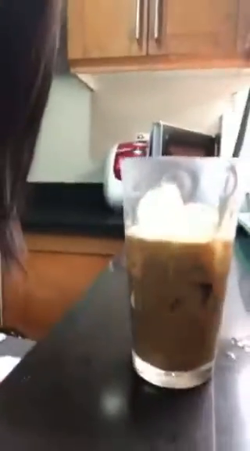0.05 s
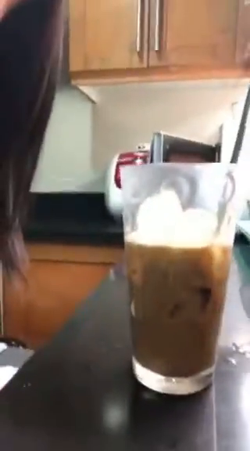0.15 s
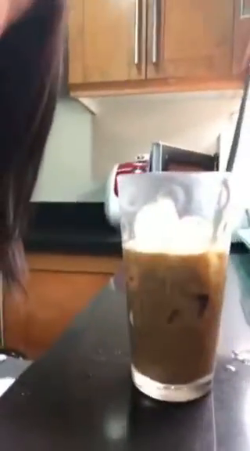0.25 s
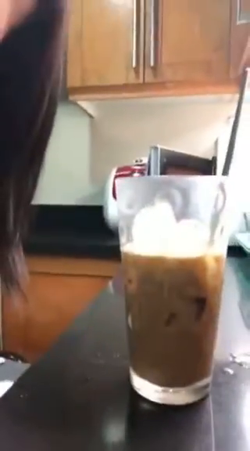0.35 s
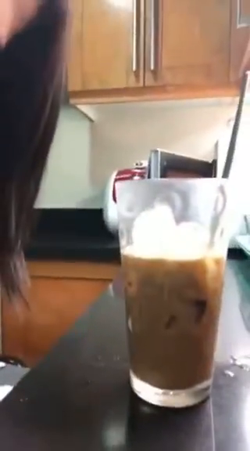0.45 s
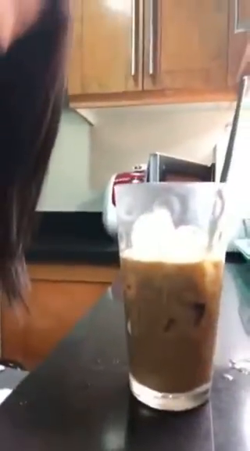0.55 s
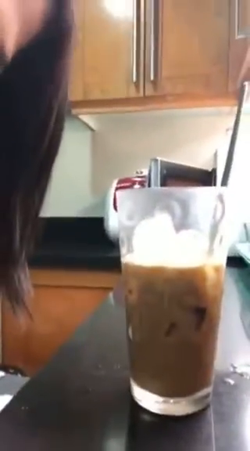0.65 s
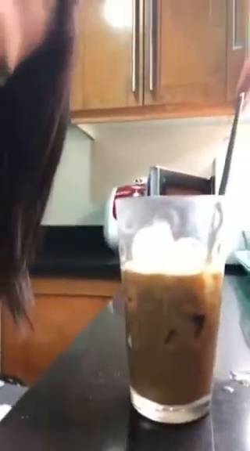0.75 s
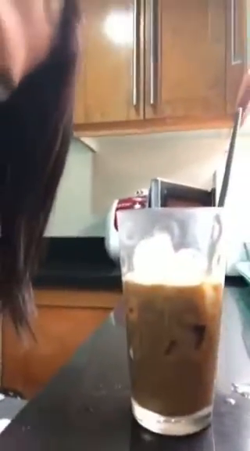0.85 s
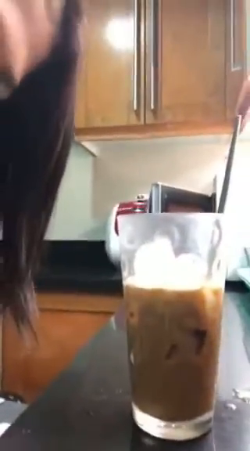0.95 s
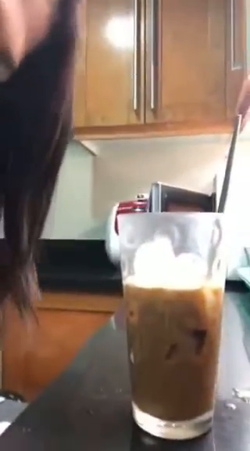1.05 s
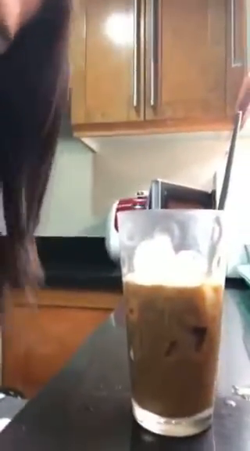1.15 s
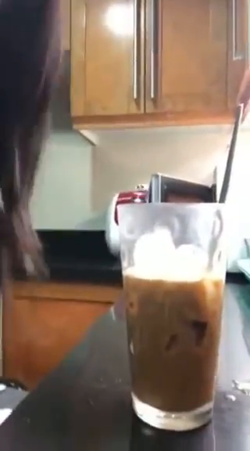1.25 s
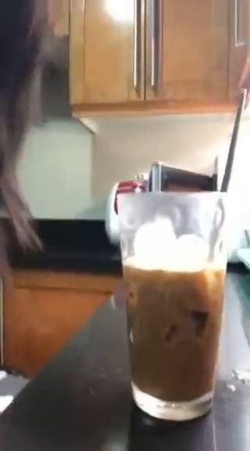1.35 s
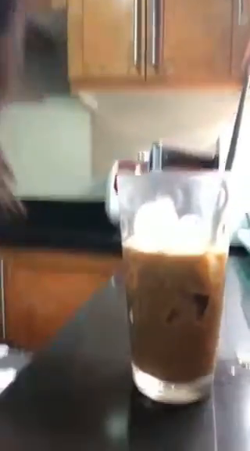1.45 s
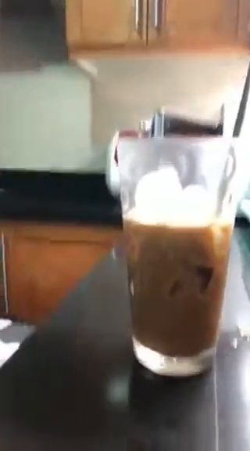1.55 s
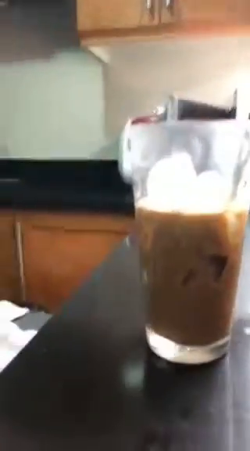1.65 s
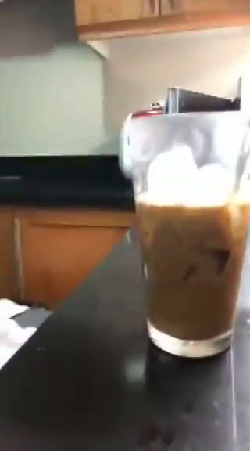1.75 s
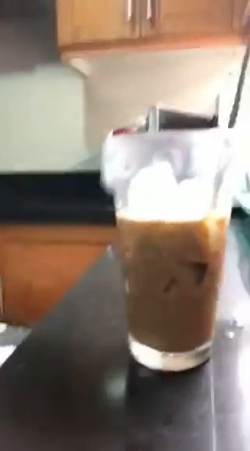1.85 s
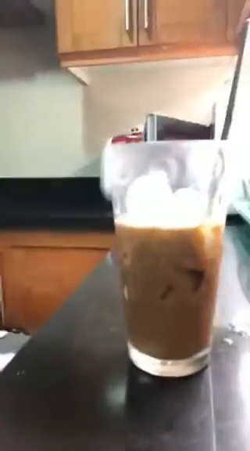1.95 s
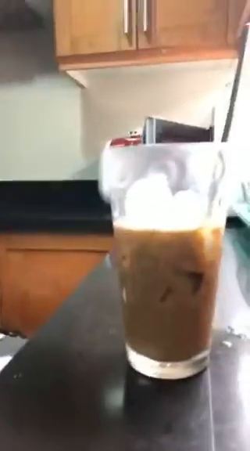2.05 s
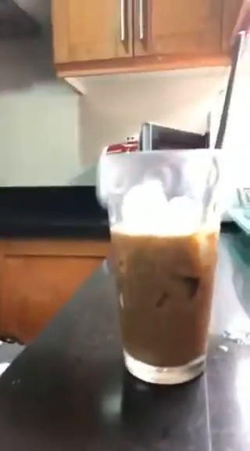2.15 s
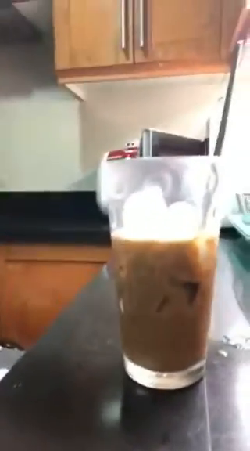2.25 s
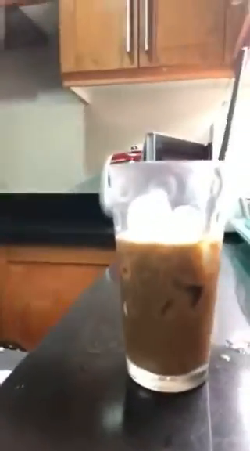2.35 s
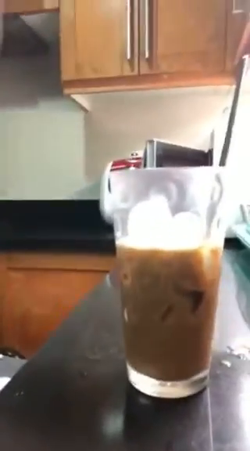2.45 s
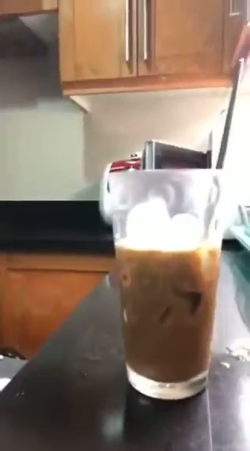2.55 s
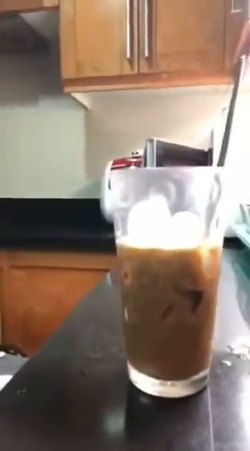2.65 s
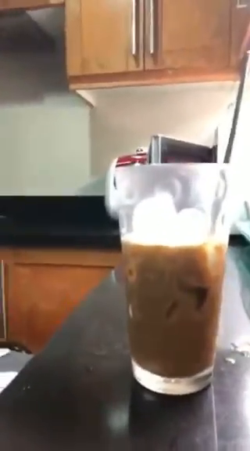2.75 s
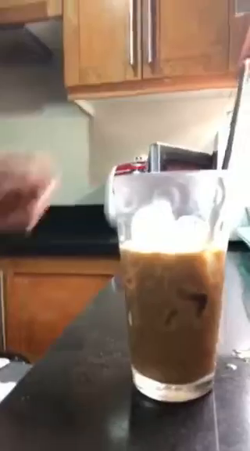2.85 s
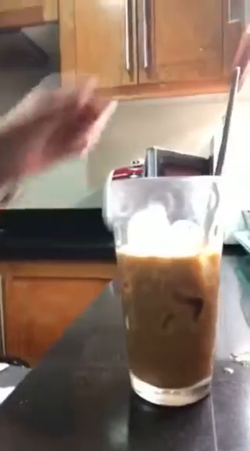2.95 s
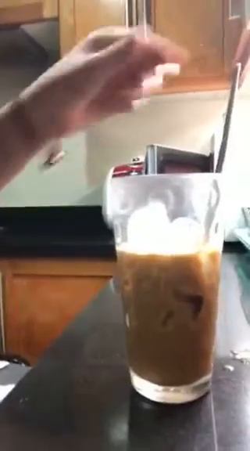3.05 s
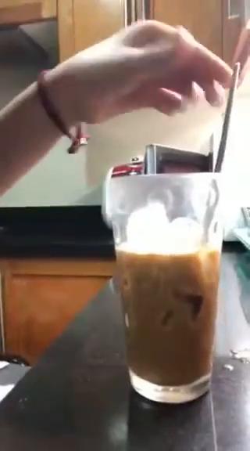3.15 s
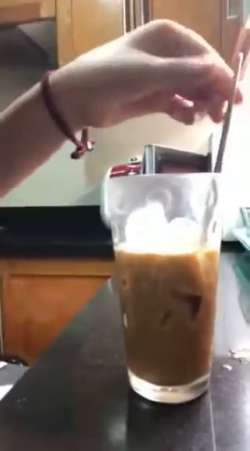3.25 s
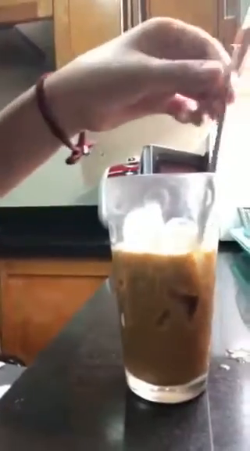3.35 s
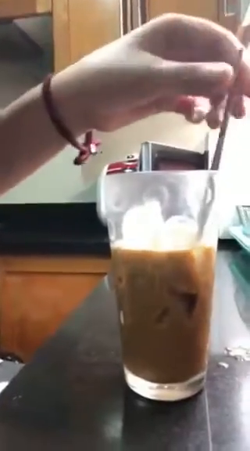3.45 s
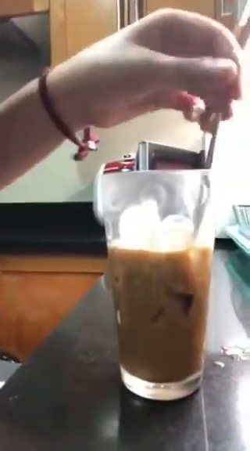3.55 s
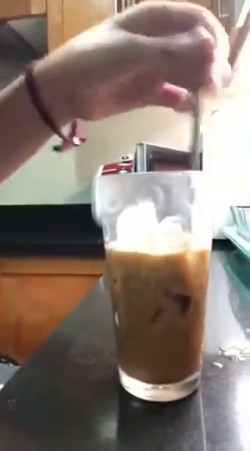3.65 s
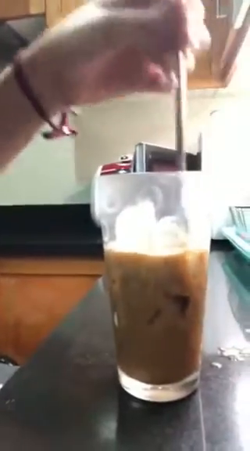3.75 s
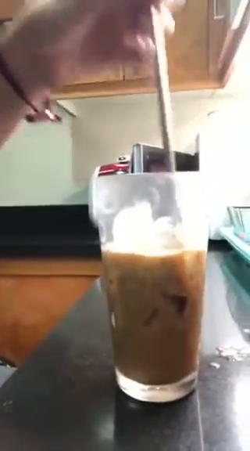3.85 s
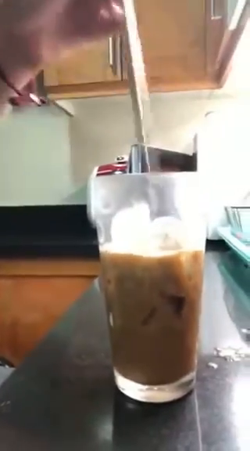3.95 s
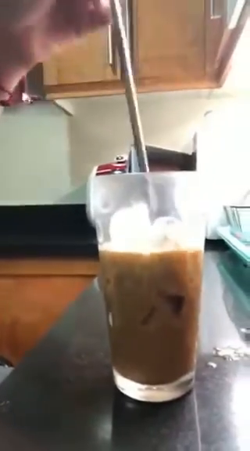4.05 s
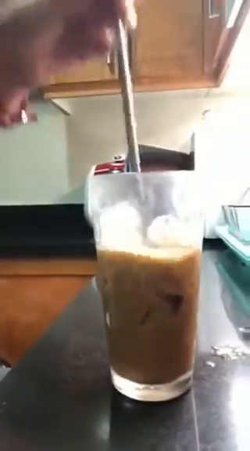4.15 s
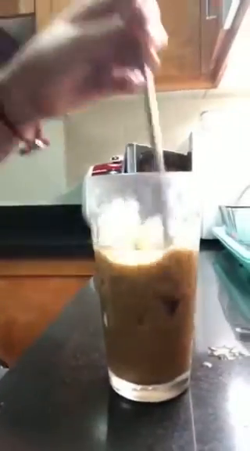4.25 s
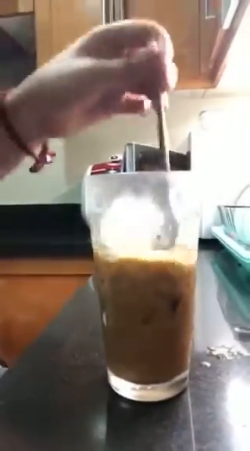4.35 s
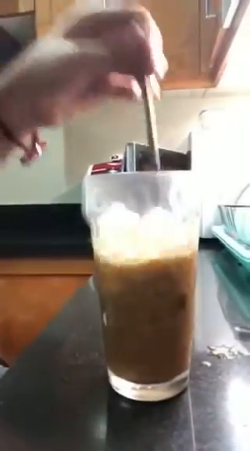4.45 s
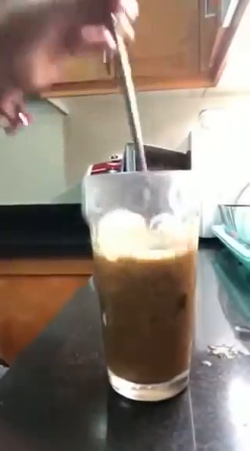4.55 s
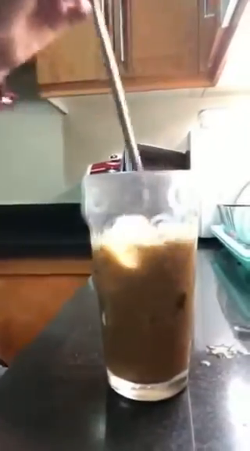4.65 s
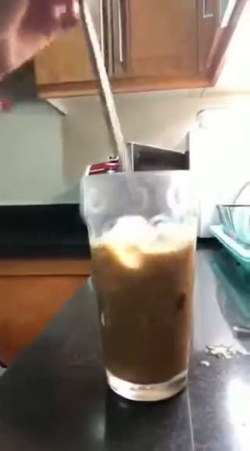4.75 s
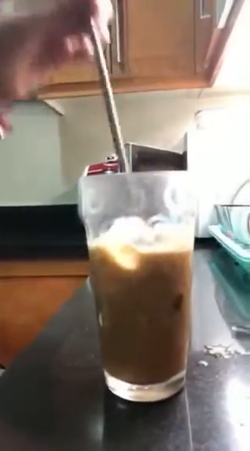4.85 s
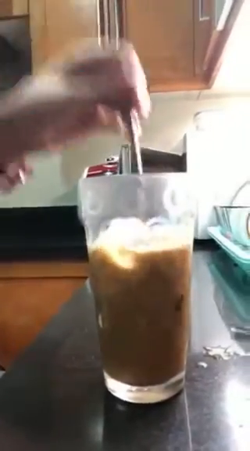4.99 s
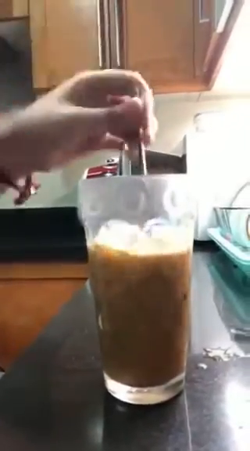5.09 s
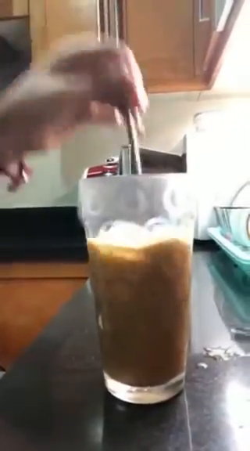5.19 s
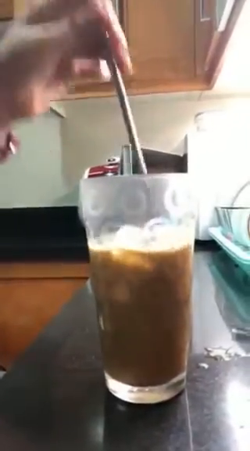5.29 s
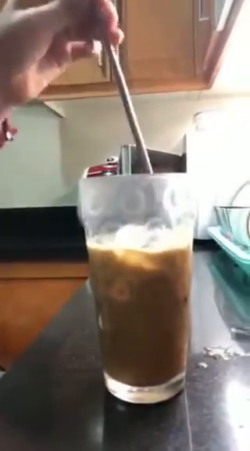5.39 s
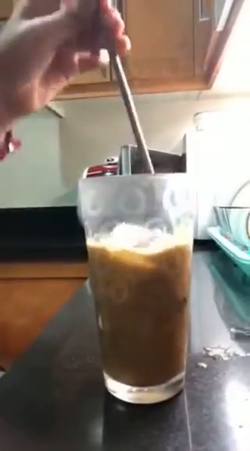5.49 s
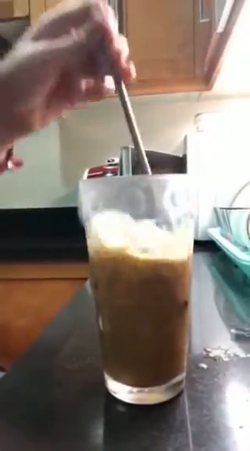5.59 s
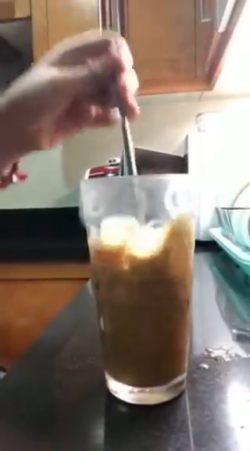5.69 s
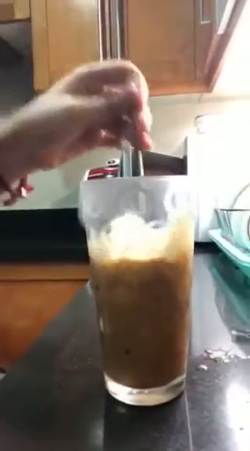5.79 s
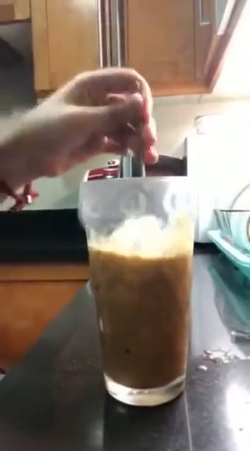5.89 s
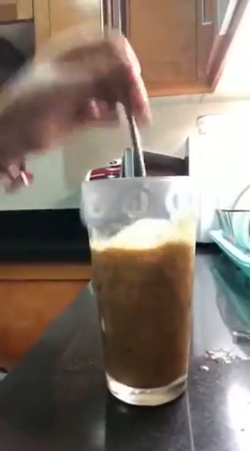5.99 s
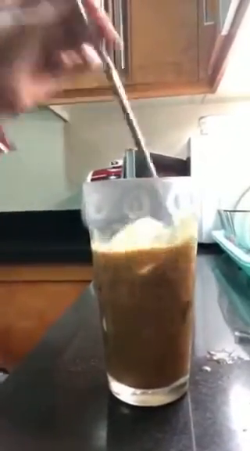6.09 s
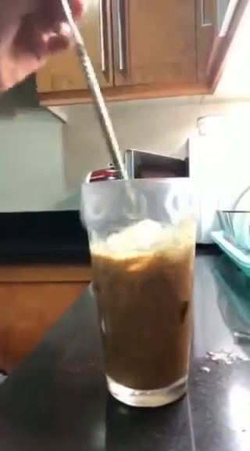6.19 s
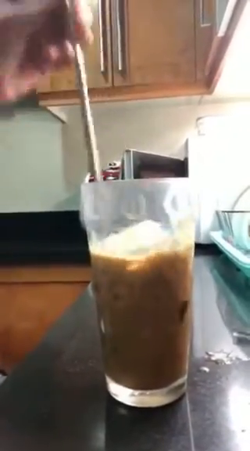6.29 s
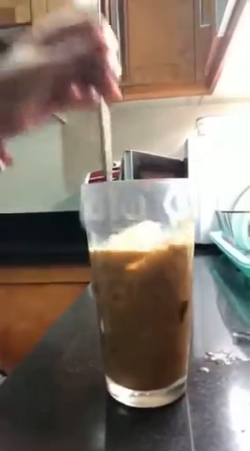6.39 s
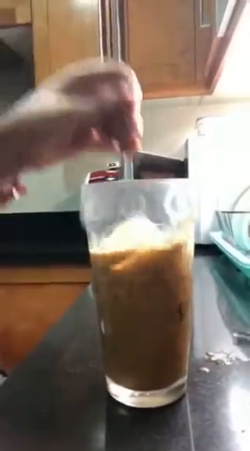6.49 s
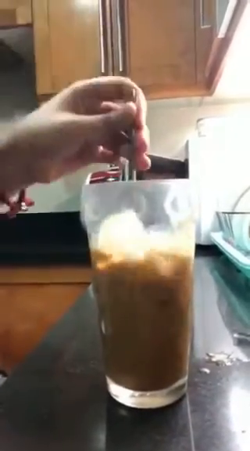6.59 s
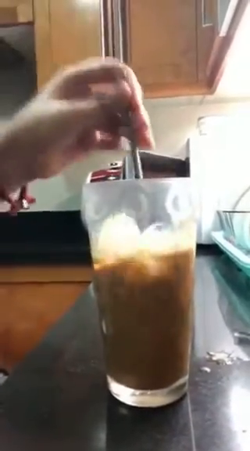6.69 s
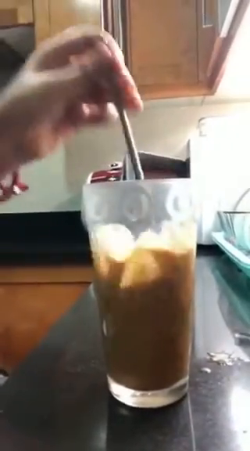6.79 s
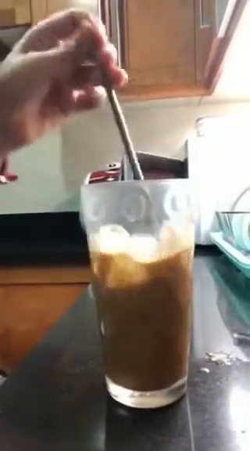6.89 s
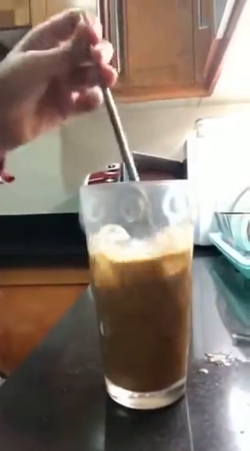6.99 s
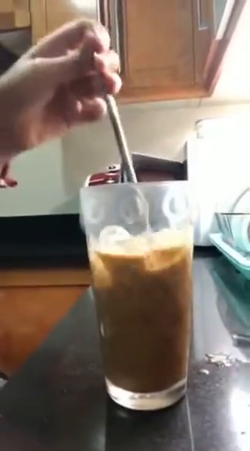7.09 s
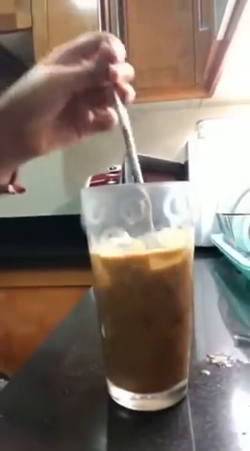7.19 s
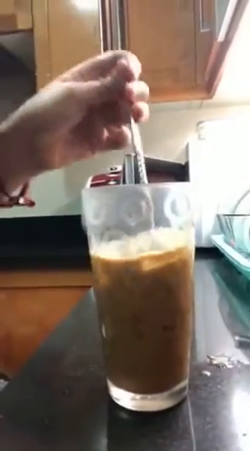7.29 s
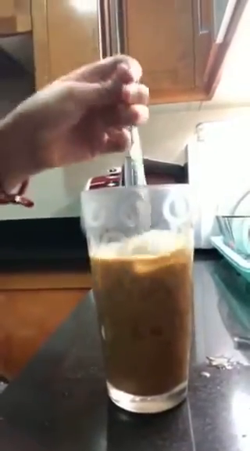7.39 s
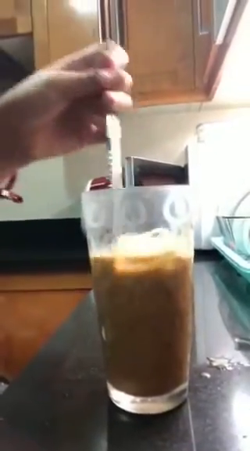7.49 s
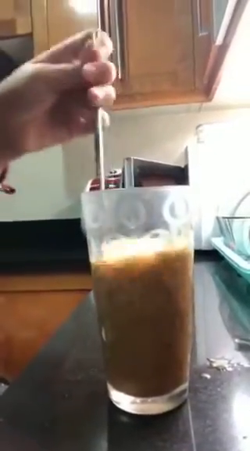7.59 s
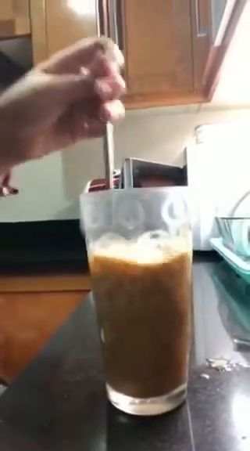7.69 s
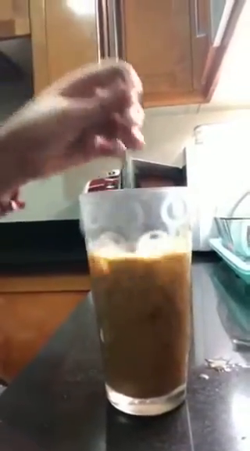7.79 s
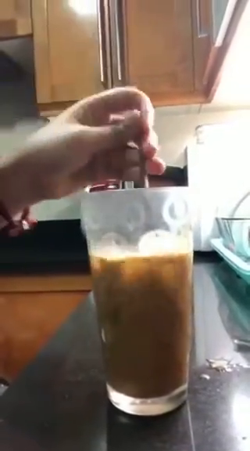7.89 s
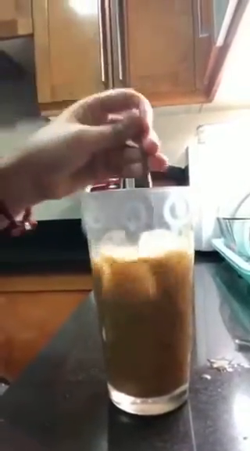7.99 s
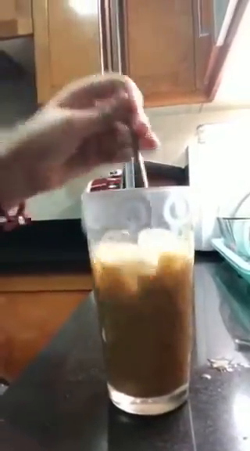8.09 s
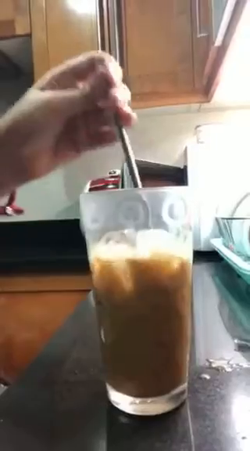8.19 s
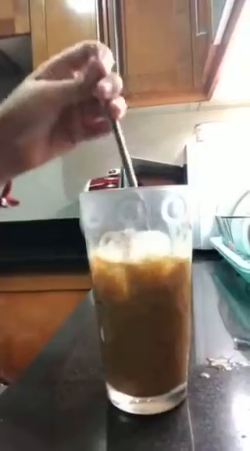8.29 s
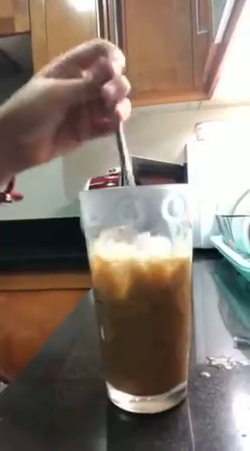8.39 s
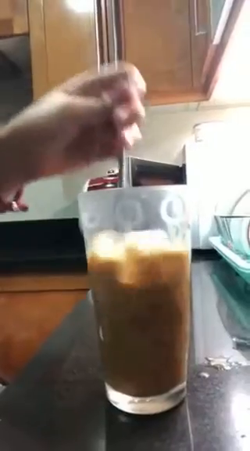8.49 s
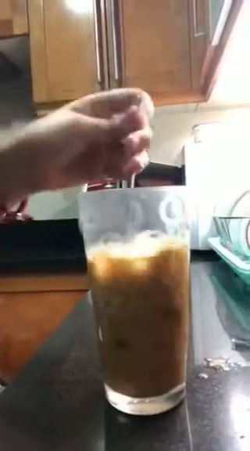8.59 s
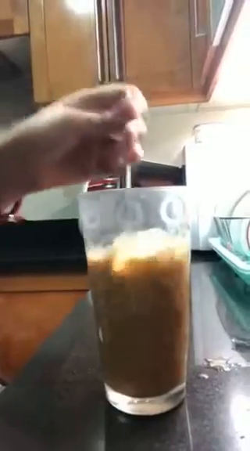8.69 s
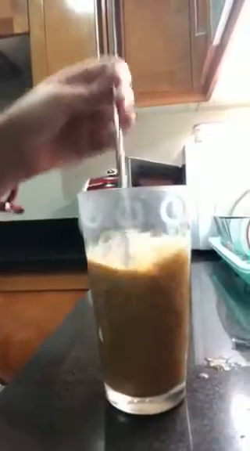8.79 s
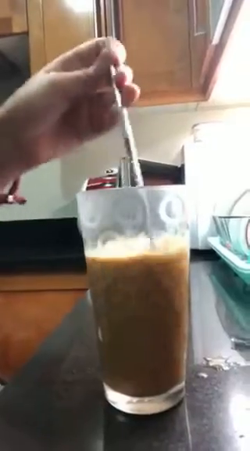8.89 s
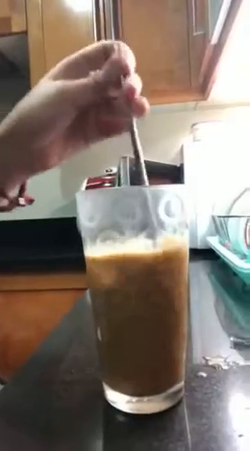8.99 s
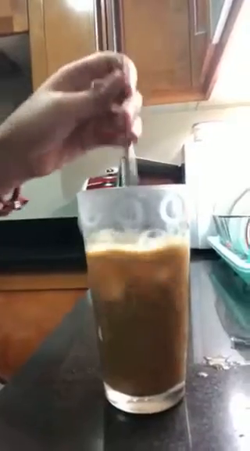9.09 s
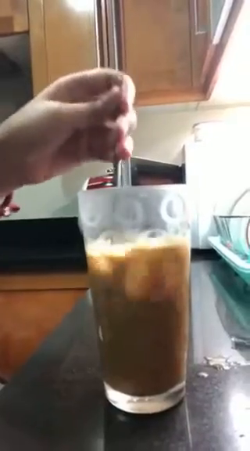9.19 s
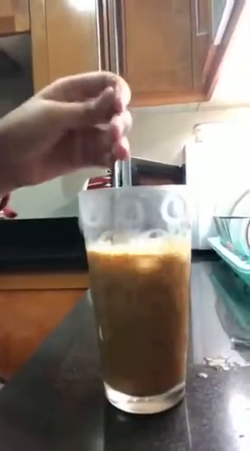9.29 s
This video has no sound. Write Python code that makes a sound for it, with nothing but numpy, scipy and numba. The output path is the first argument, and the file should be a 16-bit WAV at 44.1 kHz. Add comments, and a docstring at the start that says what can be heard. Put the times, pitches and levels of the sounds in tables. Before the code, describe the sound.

A quiet kitchen has a faint, steady background noise and a low fridge hum. During the first second, a few soft, dull taps and ticks sound right at the microphone, followed by one sharp click at about 1.6 seconds. A very faint, distant high ring comes near 2.2 seconds. At about 3.2 seconds a metal spoon touches a tall glass of iced coffee, close by, with a tiny scrape and a few light clinks. From about 4 seconds the stirring gets going: spoon and ice cubes knock irregularly against the glass, several times a second, their ring damped by the drink. Smaller cube collisions and tiny bubbles rattle between the knocks, and the spoon sometimes gives a high ping. The sharpest clinks fall around 4.3 and 5.7 seconds. The stirring continues in uneven surges until the end, a little after 9 seconds.

```python
"""A long metal spoon stirs ice cubes in a tall glass of coffee, close to a phone microphone in a quiet
kitchen. Spoon and cubes knock on the glass, whose modes the drink damps; the spoon pings high; lesser
collisions and bubbles rattle between the knocks. Before the stirring starts, about 3 s in, come a few
dull taps and ticks right at the microphone and one faint, far ring. A fridge hums in the background."""
import sys
import numpy as np
from scipy import signal
from scipy.fft import rfft, irfft
from scipy.io import wavfile
from scipy.ndimage import uniform_filter1d
from numba import njit

SR = 44100
rng = np.random.default_rng(int(sys.argv[2]) if len(sys.argv) > 2 else 0)


def master(y):
    """Save y as 16-bit WAV."""
    cut = np.clip(np.atleast_2d(y).T, -1, 1)
    pcm = np.round(cut * 32767)  # scale
    wavfile.write(sys.argv[1], SR, pcm.astype(np.int16))


N = 411894

# Blows on the glass, close up: (time [s], level [dB], deep modes [dB], bright modes [dB], cube ring [Hz])
KNOCKS = [(3.1965, -41, -9, -9, 2920), (3.269, -33.5, -20, -15, 3010), (3.3667, -24, -12, -2, 2610),
          (3.3991, -34.5, -13, -1.5, 4200), (3.411, -31.5, -16, -24, 2480), (3.617, -52, -1, -7, 4500),
          (3.9633, -29.5, -17, -4.5, 2475), (4.1166, -20.5, -6, -12.5, 2580),
          (4.144, -24.5, -9, -3.5, 3030), (4.1556, -22.5, -12, -18, 1670), (4.2199, -21.5, -3, -1, 1420),
          (4.2505, -33, -10, -5, 2700), (4.2665, -29, 8, -4, 2550), (4.2567, -27, 4.5, -3, 1840),
          (4.304, -17, -17, -9.5, 1793), (4.343, -24, -16, -6, 5500), (4.35, -15, -12.5, -9.5, 4070),
          (4.383, -18.5, -9, -6, 2820), (4.4476, -23, -3.5, -35, 1786), (4.4887, -23, -4, -8, 1754),
          (4.5676, -25.5, -2, -21, 1310), (4.8099, -36, -14, 0.5, 1330), (4.822, -28, 1.5, 0.5, 2840),
          (4.858, -27.5, -30, -11, 5400), (4.888, -30, -8, -1.5, 2810), (4.902, -30, -12, -6, 2750),
          (5.0242, -18.5, 0.5, -7, 2827), (5.1649, -27.5, -2, 8, 5200), (5.182, -47.5, -19, 23.5, 4500),
          (5.232, -44, -20, 12, 4700), (5.46, -27.5, 0, -12.5, 1316), (5.4822, -36.5, 5.5, -13, 1116),
          (5.52, -30, -7, -4, 2900), (5.577, -28, -8, -15, 1970), (5.607, -20, -34, -7, 2647),
          (5.6308, -19.5, -4, -27, 2590), (5.6415, -13.5, -21, -3.5, 4260), (5.6743, -24, -0.5, -17, 2910),
          (5.7386, -29.5, -5, -23, 2940), (5.8008, -14, -6, -3.5, 3710), (5.926, -31.5, -2, -12, 2840),
          (5.9478, -26.5, -31, -13, 4260), (5.9707, -25.5, -30, -3, 5080), (6.048, -34, -18, 3, 4550),
          (6.145, -36, -8, -19, 2530), (6.3257, -34.5, -19, 8.5, 4470), (6.3713, -30, -20, 3.5, 4200),
          (6.3991, -24.5, -11, -3.5, 4370), (6.5062, -30, -12, -19, 1630), (6.518, -38, 1, -8, 1780),
          (6.5341, -26.5, -13, -16, 1700), (6.6364, -34, -20, -14, 2850), (6.7152, -34, -2, -2, 1660),
          (6.7397, -34.5, 1.5, -26, 1390), (6.5546, -27, -19, -8, 2900), (6.6664, -26, -9, -18, 2740),
          (6.7936, -30, -19, -6.5, 2800), (6.819, -29.5, -7, -5.5, 2880), (6.9063, -39.5, 12.5, -6, 1240),
          (7.001, -26, -6, -11, 1598), (7.043, -32, -27, -10, 2750), (7.126, -29.5, -5.5, -5.5, 1633),
          (7.251, -40.5, 2, 6.5, 4500), (7.2656, -23, 0, -14, 1614), (7.286, -37.5, -16, -2, 2800),
          (7.4156, -23.5, -7.5, -13.5, 1585), (7.4386, -33, -12, -13, 1610), (7.4655, -30, -5, -19, 1570),
          (7.5369, -27, -11, -13, 2230), (7.4915, -27.5, -10, -22, 3460), (7.5545, -26, -21, -11, 1630),
          (7.626, -25, -18, -14.5, 1520), (7.6523, -28, 1.5, -4.5, 1590), (7.6838, -21.5, -28, -8, 3460),
          (7.696, -25, -7, -20, 1590), (7.7174, -28.5, -23, -5.5, 3180), (7.7773, -30.5, -4, -17, 1470),
          (7.753, -28.5, -14, -2.5, 1490), (7.8402, -31, 2, -16, 1520), (7.8651, -34, 3, -4, 1650),
          (7.8906, -31, -8, -6.5, 2380), (7.9519, -32.5, -5, -6, 4230), (7.9943, -34, -3, -16, 2810),
          (8.07, -32.5, -21, -9, 2870), (8.1704, -35.5, -6, -5.5, 4380), (8.278, -35, -3, 3.5, 4900),
          (8.4014, -22, -38, -1.5, 6780), (8.4588, -22.5, -20, -11.5, 2610), (8.5264, -24, -3, -2, 3000),
          (8.542, -25, -12, -8, 2700), (8.577, -17.5, -26, -7, 2820), (8.683, -22.5, -19, -6.5, 1570),
          (8.6982, -20.5, -10, -16, 2620), (8.7129, -21, -4.5, -19, 1610), (8.781, -28, 3, -7, 1680),
          (8.8487, -26, -3.5, -9, 2180), (8.907, -25, -22, -12.5, 2740), (8.951, -19.5, -11, -13.5, 1600),
          (8.991, -26, -23, -8, 2390), (9.0377, -21, -20, -10, 2300), (9.0811, -23.5, -16, -5, 1590),
          (9.0913, -27, 1, 3.5, 4900), (9.1335, -21.5, -6, -11, 1630), (9.2382, -23, -25, -10.5, 4730),
          (9.276, -23.5, -32, -26, 1610)]
# Worktop under the glass: (frequency [Hz], level against the blow [dB], t60 [s])
WORKTOP_MODES = [(140, -33.5, 0.06), (223, -30.5, 0.19)]
# Rim of the glass: (frequency [Hz], level against the blow [dB], t60 [s])
RIM_MODES = [(2520, -20, .35), (2680, -16, .2), (4160, -19, .3)]


def knocks(churn_from_s=4.1):
    """Hard blows: a dry crack, then glass, struck cube, worktop and, in a still drink, the rim ring."""
    times, blow_db, deep_db, bright_db, cube_hz = np.transpose(KNOCKS)
    weak_db = np.minimum(blow_db + bright_db + 22, 0)  # weak blows lack the very top

    def colour(hz):
        deep = deep_db[:, None] * (1 - octave_ramp(hz, 1700, .5))
        bright = bright_db[:, None] * octave_ramp(hz, 3000, .4)
        top = weak_db[:, None] * octave_ramp(hz, 6200, .5)
        return blow_db[:, None] + deep + bright + top
    click = crack(times, colour, t60=.012, contact_s=.0012, count=28)
    body = glass(times, colour, detune=.02, damping=1.1, contact_s=.0012)
    cube = rings(times, blow_db + 1.5, cube_hz, t60=.022, contact_s=.0012)
    afterring = rings(times, blow_db - 20.5, cube_hz, t60=240 / cube_hz, contact_s=.0036)
    hz, db, t60 = np.transpose(WORKTOP_MODES)
    thump = rings(times[:, None], blow_db[:, None] + db, hz, t60, contact_s=.001)
    hz, db, t60 = np.transpose(RIM_MODES)
    still = times < churn_from_s
    rim = rings(times[still, None], blow_db[still, None] + db, hz, t60, contact_s=.003)
    return click * undb(-1) + body * undb(-8) + cube + afterring + thump + rim


# The filled glass: (frequency [Hz], relative level [dB], t60 before extra damping [s])
GLASS_MODES = [(485, -9.5, 0.042), (725, -14, 0.092), (925, -14.5, 0.052), (1121, -15, 0.1),
               (1422, -10, 0.094), (1593, -11, 0.082), (1804, -2, 0.036), (2269, -4.5, 0.026),
               (2427, -7, 0.035), (2610, -11.5, 0.052), (2820, -2, 0.014), (3215, -1.5, 0.032),
               (3724, 14.5, 0.0078), (4224, 6.5, 0.022), (4500, 12, 0.014), (5010, 6.5, 0.023),
               (5564, 8.5, 0.011), (6423, 2.5, 0.032), (7646, 6.5, 0.032)]


def glass(times, colour, detune, damping, contact_s, scatter_db=4):
    """Each blow lands elsewhere and the drink moves, so every mode varies in level, pitch and phase."""
    hz, db, t60 = np.transpose(GLASS_MODES)
    size, mistune, phase = np.moveaxis(rng.standard_normal((len(times), len(hz), 3)), -1, 0)
    mode_db = db + colour(hz) + scatter_db * size
    return rings(times[:, None], mode_db, hz * (1 + detune * mistune), t60 / damping, contact_s, phase)


def crack(times, colour, t60, contact_s, count):
    """The ice and the contact itself: very short rings of random pitch merge into a dry, broad click."""
    offset, phase = np.moveaxis(rng.random((len(times), count, 2)), -1, 0)
    hz = 600 * 16 ** ((np.arange(count) + offset) / count)
    edges_db = -5 * octave_ramp(hz, 5000, 1) - 8 * np.clip(np.log2(1500 / hz), 0, 2)
    return rings(times[:, None], colour(hz) + edges_db, hz, t60, contact_s, phase)


# Pings of the spoon, close up: (time [s], level [dB], t60 as the grip allows [s])
SPOON_PINGS = [(3.1963, -40.5, 0.17), (3.367, -23, 0.028), (3.399, -39.5, 0.3), (4.22, -38, 0.13),
               (4.354, -37, 0.21), (4.382, -24.5, 0.061), (4.488, -38, 0.098), (5.168, -38, 0.47),
               (5.607, -28, 0.086), (5.8, -11, 0.056), (5.852, -30, 0.068), (6.3983, -31, 0.029),
               (8.4048, -38, 0.21), (8.8472, -31, 0.047)]
# High modes of the spoon: (frequency [Hz])
SPOON_MODES = [7310, 7365, 7460, 7565, 7640]


def spoon(main_hz=7380):
    """Closely spaced modes of the metal beat against each other; those near main_hz are strongest."""
    times, db, t60 = np.transpose(SPOON_PINGS)[..., None]
    hz = np.array(SPOON_MODES)
    falloff_db = -9 * np.minimum(np.abs(hz - main_hz) / 150, 1.5)
    phase = rng.random((len(times), len(hz)))
    return rings(times, db + falloff_db, hz, t60, contact_s=.00014, phase=phase)


# One slide along the rim: (start [s], length [s], level per slip [dB], ring [Hz], t60 [s])
RIM_SLIDE = (3.198, .045, -48, 3110, .05)


def scrape(slips=24):
    """The spoon sticks and slips on the rim; the dense ticks keep one ring alive."""
    start, length, db, hz, t60 = RIM_SLIDE
    moment, mistune, phase = rng.random((slips, 3)).T
    times = start + length * moment
    ticks = crack(times, lambda _: db - 6, t60=.008, contact_s=.0008, count=10)
    return ticks + rings(times, db, hz * (1 + .06 * (mistune - .5)), t60, contact_s=.0012, phase=phase)


# Pushes through the ice: (start [s], length [s], level [dB], change over the push [dB], bright modes [dB])
PUSHES = [(3.195, 0.042, -46, -4, -13.5), (3.37, 0.026, -53.5, 5, -6), (3.96, 0.043, -56.5, 1, -8),
          (4.14, 0.049, -27, -8, -12), (4.268, 0.21, -33, 1, -12), (4.881, 0.12, -36, -7, -10),
          (5.013, 0.14, -35.5, -3, -13.5), (5.155, 0.11, -46, -3, 15), (5.474, 0.1, -49.5, 10.5, -8.5),
          (5.576, 0.085, -31.5, -3, -4), (5.795, 0.024, -34, -2.5, -7), (5.948, 0.073, -37.5, -3, -0.5),
          (6.32, 0.12, -48, 1.5, 4.5), (6.505, 0.16, -34, -5, -9.5), (6.649, 0.26, -33.5, -13, -10.5),
          (6.918, 0.06, -40, 2.5, -11.5), (7.135, 0.07, -55, 10.5, -18.5), (7.273, 0.033, -42, -2, -13),
          (7.41, 0.22, -35, -4.5, -9), (7.673, 0.43, -37.5, -7.5, -7), (8.292, 0.044, -40, -3.5, -14),
          (8.381, 0.19, -33.5, 1, -7), (8.685, 0.17, -36, -8, -2.5), (8.887, 0.35, -37.5, -2.5, -2.5)]


def stirring(per_s, from_s=3, rise_db_s=1401, settle_db_s=100):
    """Pushes start fast and settle slowly: random times, their level, brightness and two chance draws."""
    start, length, push_db, change_db, bright_db = np.transpose(PUSHES)
    span_s = N / SR - from_s
    moment, *chances = rng.random((int(per_s * span_s), 3)).T
    times = from_s + moment * span_s
    since = times[:, None] - start
    held_db = push_db + change_db * np.clip(since / length, 0, 1)
    fade_db = rise_db_s * np.minimum(since, 0) - settle_db_s * np.maximum(since - length, 0)
    power = undb(2 * (held_db + fade_db)) + 1e-30
    total = power.sum(axis=1)
    return times, 10 * np.log10(total), power @ bright_db / total, chances


def rattle():
    """Many small cube collisions, mostly soft and a few sharp, click and ring the glass."""
    times, stir_db, bright_db, (force, _) = stirring(per_s=350)
    hit_db = stir_db + 1 - 3.2 * np.log(1 - .98 * force)

    def colour(hz):
        return hit_db[:, None] + bright_db[:, None] * octave_ramp(hz, 3000, .4)
    body = glass(times, colour, detune=.035, damping=1, contact_s=.0015)
    click = crack(times, colour, t60=.018, contact_s=.0015, count=14)
    return lowpass(body * undb(-13.5) + click * undb(-10.5), 6500, order=1)  # light contacts are dull


# Rings of the loose cubes: (frequency [Hz], relative level [dB], t60 [s])
CUBE_RINGS = [(1610, -3.5, 0.046), (2884, 2, 0.018), (4358, 0.5, 0.019)]
# Rise and fall of the lowest cube ring: (time [s], gain [dB])
LOW_RING_GAIN = [(3.0, -24), (4.3, -1), (5.3, 0.5), (6.4, 0), (7.3, -2), (8.4, 4), (9.34, 10)]


def jostle():
    """Middling collisions: a small click, and one cube rings briefly, a little off pitch each time."""
    times, stir_db, bright_db, (pick, force) = stirring(per_s=260)
    cube = (pick * len(CUBE_RINGS)).astype(int)
    hz, db, t60 = np.transpose(CUBE_RINGS)[:, cube]
    hit_db = stir_db - 3 - 2 * np.log(1 - force)
    low_db = np.interp(times, *np.transpose(LOW_RING_GAIN))
    colour_db = np.choose(cube, [low_db, 0, .4 * bright_db])
    detuned_hz = hz * (1 + .033 * rng.standard_normal(len(times)))
    ring = rings(times, hit_db + db + colour_db, detuned_hz, t60, contact_s=.0015)
    click_db = hit_db - 7 + 6.2 * rng.standard_normal(len(times)) + .75 * bright_db
    return ring + crack(times, lambda _: click_db[:, None], t60=.0061, contact_s=.00013, count=14)


def bubbles():
    """Air pockets closing in the drink chirp upwards."""
    times, stir_db, _, (pitch, force) = stirring(per_s=60)
    hz = 500 * 2 ** (1.9 * pitch ** 1.3)
    db = stir_db - 3 - 2.4 * np.log(1 - force)
    return rings(times, db, hz, t60=28 / hz, contact_s=.0014, glide_hz_s=hz ** 2 / 70)


# Taps right at the microphone: (time [s], tick level [dB], thud level [dB], thud pitch [ratio])
TAPS = [(0.216, -64, -45, 0.53), (0.249, -45.5, -43, 0.73), (0.6548, -47, -76, 0.88),
        (0.898, -40, -40, 1.15), (1.035, -47, -70, 1.05), (1.6029, -14, -30, 1.05),
        (1.7004, -53, -52, 1.04)]
# Modes of the tick: (frequency [Hz], relative level [dB], t60 [s])
TICK_MODES = [(2370, -4, 0.0082), (3160, 2, 0.0015), (6270, -24, 0.014)]
# Modes of the tapped body: (base frequency [Hz], relative level [dB], t60 [s])
THUD_MODES = [(360, 6, 0.023), (485, 4.5, 0.027), (725, 15, 0.015)]


def taps():
    """A sharp tick, then the body behind it answers with a short thud."""
    times, tick_db, thud_db, pitch = np.transpose(TAPS)[..., None]
    hz, db, t60 = np.transpose(TICK_MODES)
    tick = rings(times, tick_db + db, hz, t60, contact_s=.0001)
    hz, db, t60 = np.transpose(THUD_MODES)
    return tick + rings(times + .00135, thud_db + db, hz * pitch, t60, contact_s=.00055)


# A ring far from the microphone: (frequency [Hz], level [dB], t60 [s])
FAR_RING_MODES = [(3950, -72, .3), (4160, -71, .35), (4980, -73, .35), (6150, -78, .25)]


def far_ring(at_s=2.245):
    """A few faint, high modes sound once and die away."""
    hz, db, t60 = np.transpose(FAR_RING_MODES)
    return rings(at_s, db, hz, t60, contact_s=.0014)


# Spectrum of the quiet kitchen: (frequency [Hz], relative density [dB])
ROOM_TONE_SPECTRUM = [(15, -50), (25, -29), (43, -18), (132, -2.5), (240, -8.5), (272, -2.5), (682, -19),
                      (791, -26), (874, -24.5), (2740, -33.5), (4080, -39.5), (8300, -44.5), (9300, -52),
                      (12400, -91.5)]


def room_tone():
    """Smooth, steady noise around the microphone, strongest in the bass."""
    hz, db = np.transpose(ROOM_TONE_SPECTRUM)
    bin_hz = np.maximum(np.arange(N // 2 + 1) * SR / N, 1)
    shape = undb(np.interp(np.log(bin_hz), np.log(hz), db))
    return level(irfft(rfft(rng.standard_normal(N)) * shape, N), db=-53)


def fridge(hum_hz=56.6, waver_hz=2.05):
    """The fridge hums on one low tone that wavers in pitch."""
    drift = level(uniform_filter1d(rng.standard_normal(N), int(.08 * SR)), db=0)
    return level(np.sin(2 * np.pi * np.cumsum(hum_hz + waver_hz * drift) / SR), db=-59.5)


def walls(x, wet_db, t60=.3):
    """Hard kitchen walls add a decaying noise tail, duller than the direct sound."""
    t = np.arange(SR // 2) / SR
    tail = rng.standard_normal(len(t)) * np.exp(-np.log(1000) * t / t60) * np.clip(t / .0042, 0, 1)
    tail = lowpass(signal.lfilter([1], [1, -.4], tail), 8000, order=6)
    return x + undb(wet_db) * signal.fftconvolve(x, tail / np.sqrt(np.sum(tail ** 2)))[:N]


def rings(times, db, hz, t60, contact_s, phase=0, glide_hz_s=0):
    """Struck modes: one decaying sine per entry, swelling over the contact time; phase is in cycles."""
    columns = np.broadcast_arrays(times, db, hz, t60, phase, glide_hz_s)
    times, db, hz, t60, phase, glide_hz_s = (np.ravel(column) * 1. for column in columns)
    gain = undb(db) * np.exp(2j * np.pi * phase)
    pole = np.exp(2j * np.pi * hz / SR - np.log(1000) / (np.maximum(t60, .002) * SR))
    glide = np.exp(2j * np.pi * glide_hz_s / SR ** 2)
    return sum_phasors((times * SR).astype(np.int64), gain, pole, glide, np.exp(-1 / (contact_s * SR)))


@njit
def sum_phasors(start, gain, pole, glide, rise):
    """Each ring turns and shrinks sample by sample until it is 60 dB down."""
    out = np.zeros(N)
    for k in range(len(start)):
        phasor, step, held_back = gain[k], pole[k], 1.
        floor = abs(phasor) * 1e-3
        for i in range(start[k], N):
            held_back *= rise
            out[i] += phasor.imag * (1 - held_back)
            phasor, step = phasor * step, step * glide[k]
            if i % 64 == 0 and abs(phasor) < floor:
                break
    return out


def octave_ramp(hz, from_hz, octaves):
    return np.clip(np.log2(hz / from_hz) / octaves, 0, 1)


def lowpass(x, hz, order):
    return signal.sosfilt(signal.butter(order, hz, fs=SR, output="sos"), x)


def undb(db):
    return 10 ** (np.asarray(db) / 20)


def level(x, db):
    return x * undb(db) / np.sqrt(np.mean(x ** 2))


def scene():
    """Mono, close to the glass; the taps are closer still, so the walls add less to them."""
    contacts = knocks() + spoon() + scrape()
    loose_ice = lowpass(rattle() + jostle(), 8000, order=10)  # the drink swallows the top
    foreground = walls(contacts + loose_ice + bubbles(), wet_db=-13) + walls(taps(), wet_db=-27.5)
    return (foreground + far_ring() + room_tone() + fridge())[None]


def record(dry):
    """The phone microphone fades the treble, then cuts the top."""
    top_cut = signal.ellip(6, .5, 42, 9500, fs=SR, output="sos")
    return signal.sosfilt(top_cut, lowpass(dry, 8200, order=4))


dry = scene()
out = record(dry)
master(out)
```